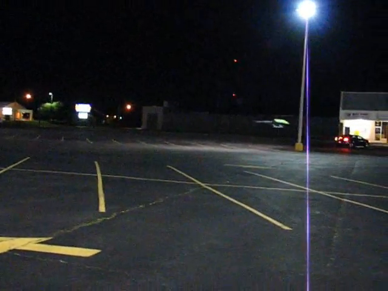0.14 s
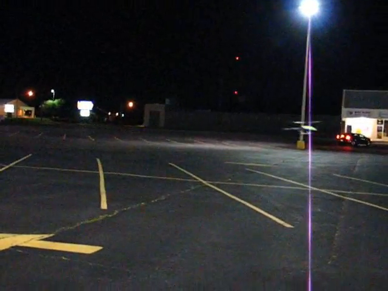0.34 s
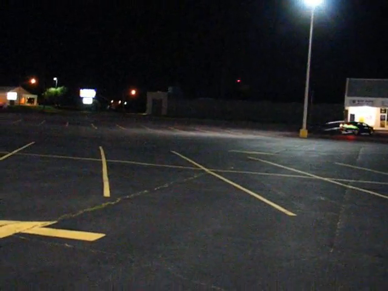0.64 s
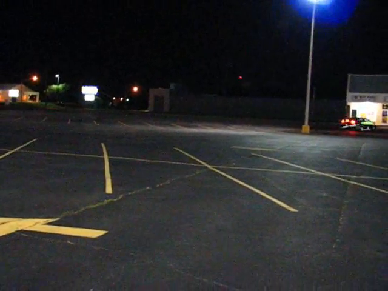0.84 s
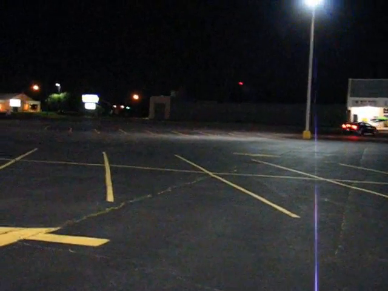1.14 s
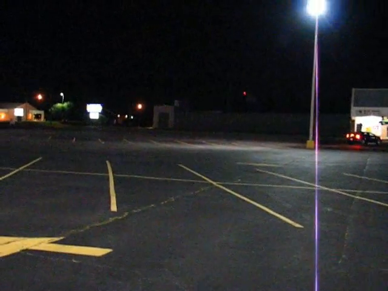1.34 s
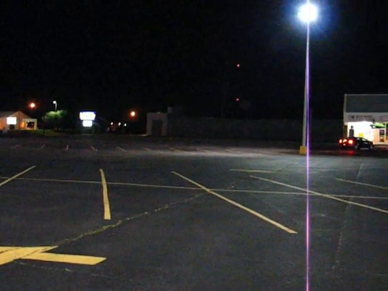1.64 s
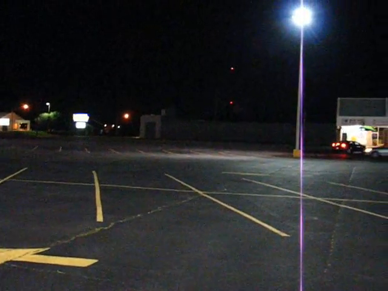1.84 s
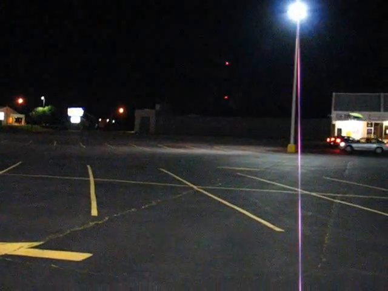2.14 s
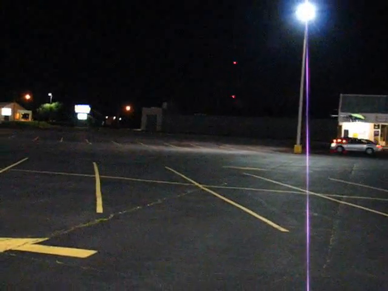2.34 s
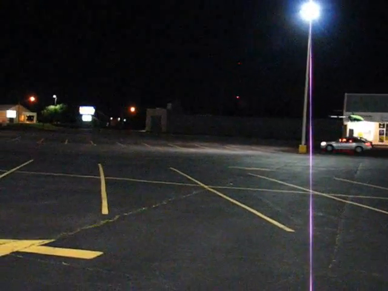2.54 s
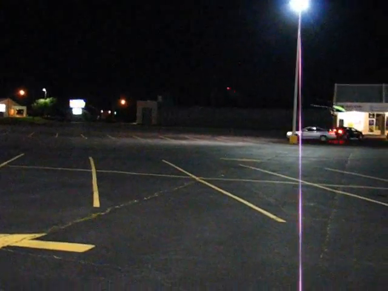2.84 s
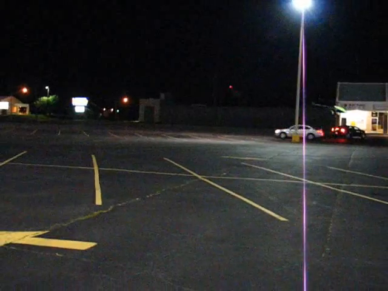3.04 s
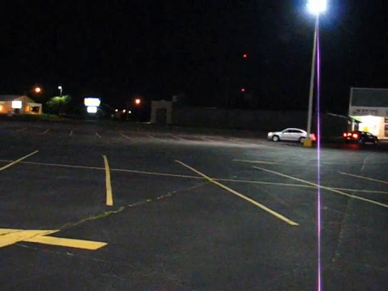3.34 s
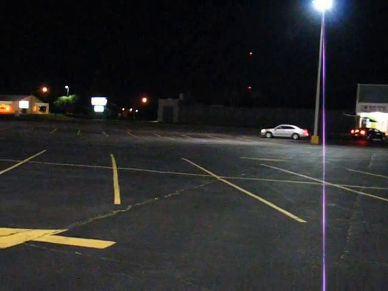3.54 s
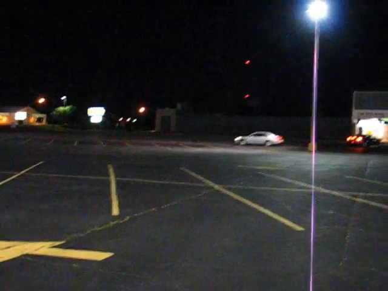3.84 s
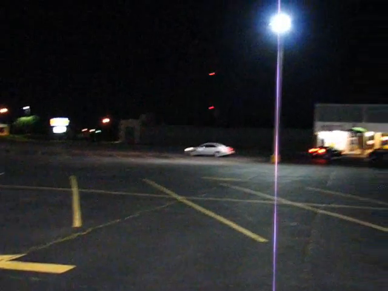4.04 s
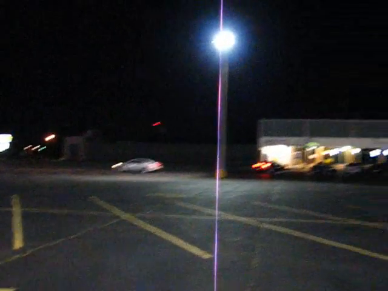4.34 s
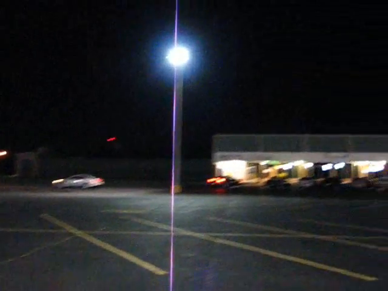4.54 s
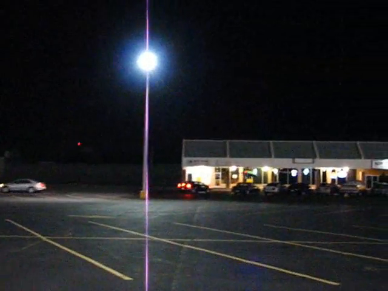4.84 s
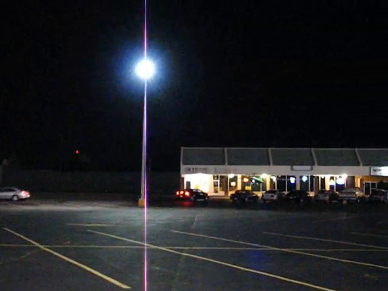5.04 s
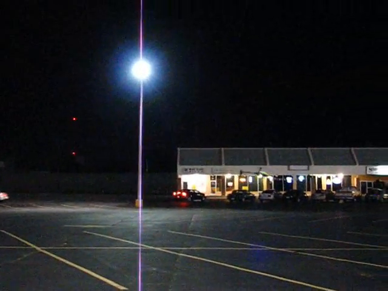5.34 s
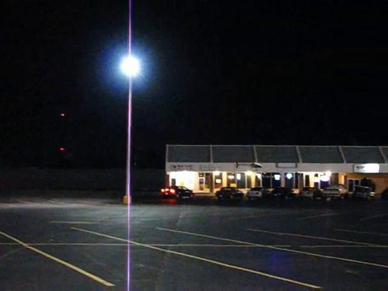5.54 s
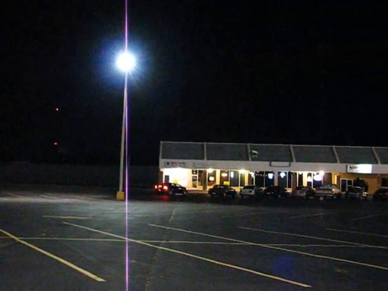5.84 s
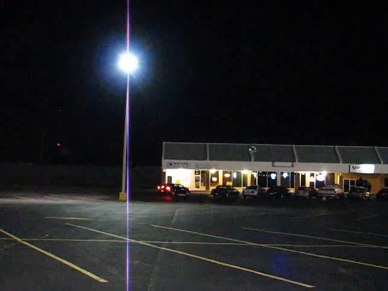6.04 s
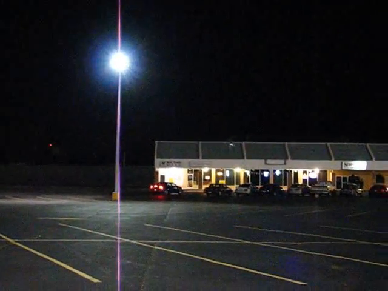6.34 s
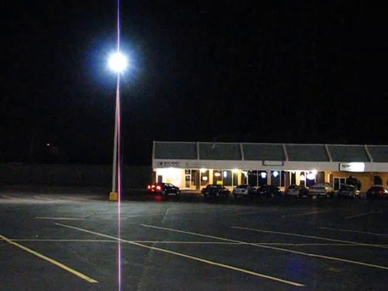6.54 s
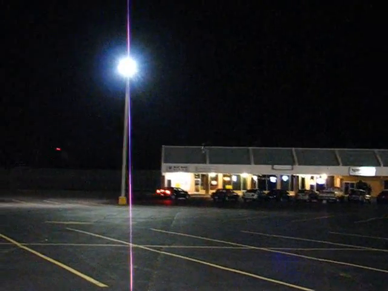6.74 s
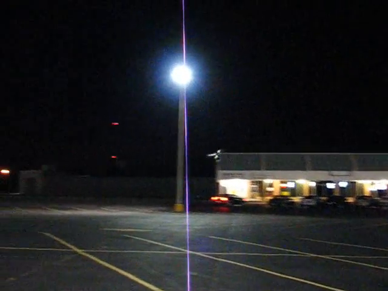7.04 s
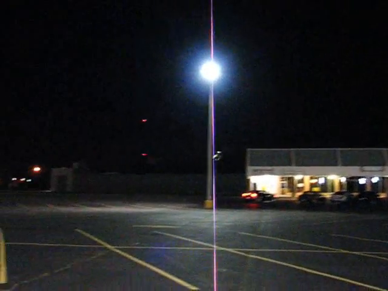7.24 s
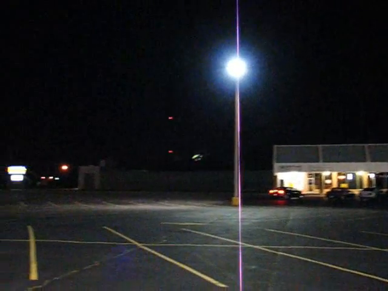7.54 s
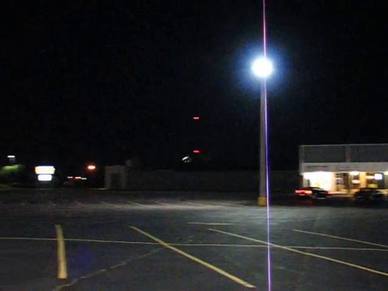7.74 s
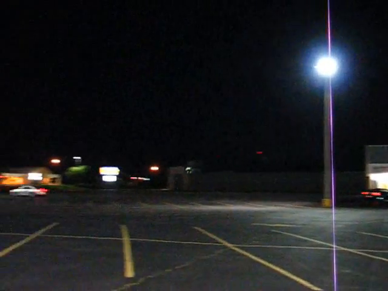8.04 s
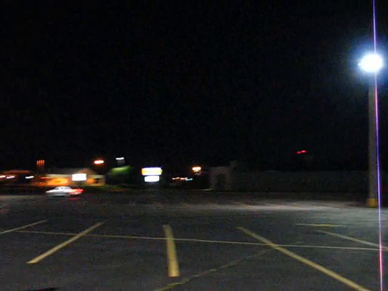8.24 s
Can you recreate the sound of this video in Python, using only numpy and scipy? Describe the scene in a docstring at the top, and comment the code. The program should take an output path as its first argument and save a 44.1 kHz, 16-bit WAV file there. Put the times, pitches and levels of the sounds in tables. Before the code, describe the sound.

A small electric model helicopter flies continuously outdoors over an empty car park. A piercing gear whine near 7.7 kilohertz wavers slightly, swelling and fading, over a bright hissing blade rush. Reflections from asphalt give the hiss a slowly sweeping, hollow comb colour. Low wind buffets mostly the left side of a handheld stereo microphone, strongest around two and four seconds, with a distant car engine and town rumble underneath.

```python
"""A small electric model helicopter circles over an empty car park at night, heard through two microphone ports.
One motor drives it all: its pinion whines on the main gear, the blades chop the air, the tail rotor hums.
The asphalt returns the rush a moment late, a sweeping comb, and some drive tones swell and fade with it.
A breeze buffets mostly the left port; far off a car pulls away, another idles, and the town rumbles.
Shafts are summed tones on shared gear angles; rush, wind and town are shaped noise."""
import sys
import numpy as np
from scipy import signal
from scipy.fft import rfft, irfft, next_fast_len
from scipy.io import wavfile
from scipy.ndimage import map_coordinates

SR = 44100
rng = np.random.default_rng(int(sys.argv[2]) if len(sys.argv) > 2 else 0)


def materialize(psi):
    """Save the field psi as 16-bit PCM at rate SR to the path in sys.argv[1].

    A 1-D psi becomes a single channel; in a 2-D psi each row is a channel.
    """
    bounded = np.clip(np.atleast_2d(psi).T, -1, 1)
    quanta = np.round(bounded * 32767).astype(np.int16)
    wavfile.write(sys.argv[1], SR, quanta)


N = 369999

PINION, MAIN_GEAR = 13, 150  # teeth
TAIL_RATIO = 106 / 25  # tail shaft turns per rotor turn

# teeth meeting per second on the main gear, sagging when the blades bite: [t/s, f/Hz]
MESH_RATE = [(0.0, 7807), (0.33, 7836), (0.47, 7821), (0.85, 7720), (1.08, 7598), (1.21, 7556),
             (1.67, 7683), (1.77, 7722), (1.87, 7714), (2.12, 7626), (2.44, 7751), (2.87, 7781),
             (3.17, 7762), (3.51, 7771), (4.01, 7650), (4.24, 7706), (4.74, 7751), (4.95, 7727),
             (5.28, 7656), (5.66, 7614), (6.11, 7606), (6.86, 7637), (7.4, 7617), (7.49, 7607),
             (7.72, 7535), (7.96, 7642), (8.17, 7708), (8.39, 7700)]
# how far the banked rotor disc faces the listener: [t/s, share 0-1]
BANK_TOWARDS_LISTENER = [(0, 0.13), (4.5, 0.1), (5.1, 0.34), (5.6, 0.29), (6.0, 0.82), (6.75, 0.93),
                         (7.15, 0.58), (7.6, .32), (8.39, 0.17)]
# port colour: [f/Hz, left minus right level/dB]
PORT_BALANCE = [(200, -2.5), (900, 1), (1800, -0.5), (2700, -3.5), (3800, -4), (5200, 0), (6500, -0.5),
                (7600, -1), (9500, -2), (11000, -2.5), (12500, 9), (15000, -4)]
# phase between the ports: [f/Hz, lead of the left/rad]
LEFT_PORT_LEAD = [(700, 0.075), (1400, 0.29), (2700, -0.89), (4300, -0.27), (6200, 0.36), (9000, -0.753),
                  (10300, 0.39), (12400, -1.44)]


def helicopter():
    """All shafts are geared together; each microphone port colours the sound in its own way."""
    mesh_hz, = curves(MESH_RATE)
    bank, = curves(BANK_TOWARDS_LISTENER)
    mesh = 2 * np.pi * np.cumsum(mesh_hz) / SR
    rotor = mesh / MAIN_GEAR
    sound = drive(mesh, mesh_hz, rotor, bank)
    sound = sound + rushing(rotor, bank)
    sound = sound + tail_rotor(rotor * TAIL_RATIO, bank)
    sound = sound + tip_chirp(rotor)

    def both_ports(hz):
        level = amp(along(PORT_BALANCE, hz) / 2)
        lead = np.exp(1j * along(LEFT_PORT_LEAD, hz) / 2)
        left = level * lead
        return np.array([left, 1 / left])

    return filtered(sound, both_ports)


# the whine swells and fades as the airframe turns and its bounce falls in and out of step:
# [t/s, level/dB before WHINE_DB]
WHINE_LEVEL = [(0.0, -28), (0.09, -25), (0.18, -29), (0.33, -24), (0.42, -30), (0.47, -24), (0.67, -29),
               (0.72, -24), (0.96, -32), (1.14, -20), (1.29, -26), (1.4, -22), (1.63, -32), (1.78, -26),
               (1.82, -30), (2.03, -19), (2.22, -30), (2.29, -22), (2.48, -26), (3.13, -24), (3.27, -28),
               (3.9, -23), (4.04, -27), (4.25, -23), (4.67, -27), (4.95, -23), (5.33, -25), (5.68, -23),
               (5.8, -26), (6.49, -23), (6.82, -31), (7.17, -22), (7.34, -30), (7.45, -29), (7.67, -17),
               (7.78, -21), (7.92, -31), (8.13, -25), (8.23, -32), (8.39, -27)]
# the whine's warble, once each rotor turn, deepest on entering the bank: [t/s, swing/rad]
WARBLE_SWING = [(0, .25), (4.7, .25), (5.1, .7), (5.7, .85), (6.2, 1.6), (6.6, .65), (7.2, .3), (8.39, .25)]
# the motor's whistle, loudest when it turns towards the listener: [t/s, level/dB before WHISTLE_DB]
WHISTLE_LEVEL = [(0, -41), (1.6, -44), (2, -37), (2.5, -47), (3.7, -38), (4.4, -48), (4.8, -41),
                 (5.16, -34), (5.48, -34.5), (5.68, -44), (5.8, -29.5), (6.1, -32), (6.4, -36), (6.55, -30),
                 (6.8, -27), (7.1, -34), (7.3, -43), (7.47, -34.5), (7.9, -41), (8.15, -35.5), (8.39, -38)]
# side tones of an out-of-round main gear: [rotor orders off the mesh], then [level/dB in level flight]
SIDE_OFFSETS = (-8, -4.24, 4.24, 8)
SIDE_LEVELS = [-37, -41, -45, -38]
# side tones just under the mesh: [rotor orders off the mesh], then [level/dB at full resonance]
JUDDER_OFFSETS = (-4, -3, -2, -1)
JUDDER_LEVELS = [-32, -31, -34.5, -28.5]
# motor hum: [multiples of the motor shaft speed], then [relative level/dB]
HUM_ORDERS = (1, 2, 3, 4, 5, 10, 11, 14)
HUM_LEVELS = [1, -12.5, -8, -3, 2.5, -6, -6, -36]
WHINE_DB, WHISTLE_DB = 0.3, 2  # added to their level curves
UNDER_DB, UNDER_BANK_DB = -40.5, 10  # in level flight, and the change in a full bank
HUM_DB, HUM_BANK_DB, HUM_WANDER_DB = -50.3, 9.5, 0.58  # the same, and a slow wander
FRAME_HZ, FRAME_WIDTH_HZ = 7520, 74  # a resonance of the frame, neared when the motor bogs down
GEAR_MIRROR, LOW_MIRROR = 0.35, 0.66  # share mirrored by the asphalt: gear side tones, low tones


def drive(mesh, mesh_hz, rotor, bank):
    """Pinion teeth whine on the main gear; the motor hums and its nine slots whistle."""
    whine_db, = curves(WHINE_LEVEL)
    warble, = curves(WARBLE_SWING)
    whistle_db, = curves(WHISTLE_LEVEL)
    motor = mesh / PINION
    teeth = mesh + warble * np.sin(rotor)

    whine = amp(whine_db + WHINE_DB) * tone(teeth, flutter_db=0.3, smear=0.24, rate=39)
    whine = whine * chop(rotor, once=0.07 + 0.15 * bank, twice=0.044)
    # so short a wave meets the two ports unevenly, and drifts between them
    drift_db = 1.0 * wobble(11)
    whine = whine * amp([drift_db, -drift_db])

    side_orders = np.add(MAIN_GEAR, SIDE_OFFSETS)
    sides = amp(3.5 * bank) * tones(rotor, side_orders, SIDE_LEVELS, flutter_db=2.5, smear=0.68, rate=25)

    # the ringing frame picks up the side tones just under the mesh, and the whine turns harsh
    ringing = 1 / (1 + ((mesh_hz - FRAME_HZ) / FRAME_WIDTH_HZ) ** 2)
    judder_orders = np.add(MAIN_GEAR, JUDDER_OFFSETS)
    judder = tones(rotor, judder_orders, JUDDER_LEVELS, flutter_db=3.0, smear=0.52, rate=30)
    judder = ringing ** 4 * judder

    whistle = amp(whistle_db + WHISTLE_DB) * tone(9 * motor, flutter_db=0.5, smear=0.12, rate=14)

    hum_db = HUM_DB + HUM_BANK_DB * np.sqrt(np.abs(bank)) + HUM_WANDER_DB * wobble(3.017)
    hum = amp(hum_db) * tones(motor, HUM_ORDERS, HUM_LEVELS, flutter_db=1.6, smear=0.35, rate=12)

    # the pinion's once-a-turn wobble sings below the mesh, loudest in the bank with the gear in plain view
    under = amp(UNDER_DB + UNDER_BANK_DB * bank) * tone(teeth - motor, flutter_db=1.5, smear=0.35, rate=25)
    under = under * chop(rotor, once=0.2 * bank, twice=0.05)

    direct = whine + judder + whistle
    echoes = amp(-12) * scatter(whine, t60=0.37)
    return direct + echoes + ground(under + sides, GEAR_MIRROR) + ground(hum, LOW_MIRROR)


# hiss sent towards the listener: [t/s, gear hiss level/dB before trim and bank, fine treble hiss level/dB]
HISS_LEVELS = [(0.0, -21.5, -34), (0.14, -20, -32.5), (0.82, -22, -34.5), (1.54, -22.5, -28),
               (1.78, -19.5, -29), (2.05, -22.5, -36), (3.55, -19.5, -31), (3.88, -21.5, -37.5),
               (4.25, -21, -32.5), (4.32, -25, -34), (4.7, -19, -33), (4.86, -20.5, -34),
               (5.58, -19.5, -29.5), (7.01, -24.5, -39.5), (7.57, -22, -38), (7.83, -25.5, -41.5),
               (7.92, -23.5, -39.5), (8.39, -24, -38.5)]
# main blades' whoosh, following load and distance: [t/s, level/dB before WHOOSH_DB]
WHOOSH_LEVEL = [(0.0, -30), (0.23, -28), (1.12, -27.5), (1.17, -31.5), (1.4, -29), (1.42, -33),
                (1.75, -26.5), (2.29, -31), (2.97, -25.5), (3.2, -28.5), (3.36, -27.5), (4.28, -29),
                (4.37, -33), (4.6, -27.5), (5.61, -29), (6.8, -34.5), (7.57, -26.5), (7.74, -31),
                (8.2, -27.5), (8.39, -29)]
# narrow sizzle, probably eddies shed from the blades' trailing edges: [t/s, level/dB]
SIZZLE_CURVE = [(0, -31.5), (.2, -31.5), (.6, -30), (.8, -40), (1.25, -33.5), (1.5, -40.5), (2, -35),
                (2.4, -36), (3.6, -32.5), (4.3, -33.5), (4.75, -32.5), (5.5, -35), (6.4, -47), (7, -51),
                (7.6, -36), (8.3, -35)]
# how hard whoosh and gear hiss pulse with each rotor turn: [t/s, depth 0-1]
PULSE_DEPTH = [(0, .08), (.6, .04), (4.3, .04), (4.7, .11), (5.5, .16), (5.9, .08), (8.39, .04)]
# how cleanly the asphalt returns the rush: [t/s, share of the mids 0-1, share of the treble 0-1]
BOUNCE_CLARITY = [(0, .5, .44), (.6, .7, .4), (1.1, .97, .38), (1.4, .65, .35), (1.75, .88, .4),
                  (2.15, .88, .55), (2.6, .62, .35), (3.3, .6, .28), (3.8, .58, .5), (4.25, .95, .62),
                  (4.6, .62, .55), (5, .68, .6), (5.8, .55, .3), (6.9, .7, .32), (7.4, .62, .6),
                  (7.8, .68, .76), (8.39, .9, .68)]
# noise colours of blades, sizzle, tooth friction, fine hiss and downwash: [f/Hz, relative level/dB per Hz]
WHOOSH_COLOUR = [(150, -9.5), (350, -2), (700, -8.5), (1000, -10.5), (1400, -5.5), (1900, -3.3), (2400, -1),
                 (3000, 2), (3350, 1.46), (3750, 0), (4300, 0.5), (6500, -4.5), (9000, -13.5), (15000, -48)]
SIZZLE_COLOUR = [(3100, -40), (3500, -6.5), (3750, 0), (3950, -4), (4400, -45)]
GEAR_COLOUR = [(2500, -32), (4500, -12), (6000, -4.5), (7000, -1), (7700, 0), (8300, -4.5), (9300, -8.5),
               (11000, -20), (15000, -54)]
AIR_COLOUR = [(7000, -29), (9500, 5.5), (11000, 14.5), (12400, 14.5), (13800, 6), (15200, -16)]
WASH_COLOUR = [(150, -13), (350, 7.5), (520, -14), (700, 2), (950, -31), (1500, -14)]
# what the asphalt mirrors, before its clarity; rough ground scatters the highest: [f/Hz, share]
MIDS_MIRROR = [(300, .45), (900, .7), (1400, 1), (1900, 1), (2600, 0)]
TREBLE_MIRROR = [(1900, 0), (2600, 1), (4000, .74), (7000, .48), (12000, .12)]
WHOOSH_DB = 3.5  # added to its level curve
GEAR_DB, GEAR_BANK_DB = -0.4062, 0.25  # added to its level curve, and the change in a full bank


def rushing(rotor, bank):
    """Blades, tooth friction and downwash pulse with the rotor; the bounce sweeps notches through them."""
    gear_db, air_db = curves(HISS_LEVELS)
    whoosh_db, = curves(WHOOSH_LEVEL)
    sizzle_db, = curves(SIZZLE_CURVE)
    pulsing, = curves(PULSE_DEPTH)
    mids_share, treble_share = curves(BOUNCE_CLARITY)

    whoosh = amp(whoosh_db + WHOOSH_DB) * wide_noise(WHOOSH_COLOUR) * chop(rotor, once=pulsing, twice=0.04)
    sizzle = amp(sizzle_db) * wide_noise(SIZZLE_COLOUR) * chop(rotor, once=0.05, twice=0.1)
    gear_gain = amp(gear_db + GEAR_DB + GEAR_BANK_DB * bank)
    gears = gear_gain * wide_noise(GEAR_COLOUR) * chop(rotor, once=pulsing, twice=0.06)
    # the louder the fine hiss, the harder the blades chop it
    swish = np.minimum(amp(air_db + 33), 1.3)
    air = amp(air_db) * wide_noise(AIR_COLOUR) * chop(rotor, once=0.18 * swish, twice=0.24 * swish)
    wash = amp(-31.5) * bank * wide_noise(WASH_COLOUR) * chop(rotor, once=0.266, twice=0.39)

    rush = whoosh + sizzle + gears + air + wash
    mids = filtered(rush, lambda hz: along(MIDS_MIRROR, hz))
    treble = filtered(rush, lambda hz: along(TREBLE_MIRROR, hz))
    return rush + bounce(mids_share * mids + treble_share * treble)


# the tail rotor's work against the torque: [t/s, shaft buzz level/dB]
TAIL_BUZZ_LEVEL = [(0, -43), (.27, -39.5), (.9, -42.5), (1.5, -49), (2, -39.5), (2.45, -46), (3.05, -38.5),
                   (3.3, -43), (3.95, -42), (4.3, -56), (4.7, -41), (5.02, -55), (5.2, -45.5), (6.15, -39),
                   (6.95, -48), (7.5, -44), (8.39, -43)]
# low tail blade tone: [t/s, level/dB]
LOW_BLADE_LEVEL = [(0, -50.5), (.22, -42), (.45, -52), (.85, -44), (1.15, -49.5), (1.6, -50), (1.72, -42.5),
                   (1.82, -50), (1.94, -36), (2.04, -50), (2.13, -43), (2.25, -50), (3.7, -46.5),
                   (4.5, -52), (5.2, -45), (5.9, -53.5), (6.7, -57), (7.3, -43), (7.7, -43), (8.25, -34.5)]
# high tail blade tones together: [t/s, gain/dB]
HIGH_BLADE_LEVEL = [(0, -45), (1.1, -42.5), (1.5, -46), (3.1, -43), (4.7, -45.5), (5.3, -42), (6.6, -56.5),
                    (7.4, -39), (7.8, -41.5), (8.2, -37)]
# high tail blade tones: [multiples of the tail shaft speed], then [relative level/dB]
HIGH_BLADE_ORDERS = (6, 8, 9, 10, 11, 12)
HIGH_BLADE_DBS = [0, -4, -3, -2, -3, -5]


def tail_rotor(tail, bank):
    """The geared-up tail shaft buzzes; its two blades cut the ragged wake of the main rotor."""
    buzz_db, = curves(TAIL_BUZZ_LEVEL)
    low_db, = curves(LOW_BLADE_LEVEL)
    high_db, = curves(HIGH_BLADE_LEVEL)
    thrust = amp(-37.5) * np.abs(bank) ** 1.2 * tone(2 * tail, flutter_db=1.2, smear=0.15, rate=12)
    buzz = amp(buzz_db) * tone(3 * tail, flutter_db=1.46, smear=0.2, rate=20)
    low = amp(low_db) * tone(4 * tail, flutter_db=1.8, smear=0.29, rate=34)
    # the wake blurs the high blade tones into narrow bands
    high = tones(tail, HIGH_BLADE_ORDERS, HIGH_BLADE_DBS, flutter_db=1.8, smear=1.15, rate=60)
    return thrust + low + ground(buzz + amp(high_db) * high, LOW_MIRROR)


TIP_AT_S, TIP_HALF_S = 1.42, 0.24  # moment of the chirps, and time to fall to 1/e on either side
TIP_DB, TIP_HZ, TIP_RISE_HZ = -41, 12200, 380  # peak level, pitch, rise per radian of the turn


def tip_chirp(rotor):
    """A thin rising chirp once each rotor turn, probably a whistling blade tip swinging towards the listener."""
    turn = rotor % (2 * np.pi) - np.pi
    facing = np.exp(-((np.arange(N) / SR - TIP_AT_S) / TIP_HALF_S) ** 2)
    angle = 2 * np.pi * np.cumsum(TIP_HZ + TIP_RISE_HZ * turn) / SR
    flash = unit(np.exp(-(turn / 0.8) ** 2))
    return amp(TIP_DB) * facing * flash * tone(angle, flutter_db=2.5, smear=0.9, rate=500)


def ground(x, share):
    """With their bounce added, steady tones swell and fade as its lag changes."""
    return x + share * bounce(x)


# lag of the bounce off the asphalt, longer when flying high or near: [t/s, lag/ms]
BOUNCE_LAG = [(0, 1.385), (.13, 1.365), (.29, 1.295), (.42, 1.18), (.6, 1.07), (.82, .94), (1.0, .915),
              (1.12, .955), (1.3, 1.08), (1.54, 1.225), (1.9, 1.255), (2.35, 1.43), (2.77, 1.41),
              (3.12, 1.52), (3.32, 1.47), (3.6, 1.345), (3.79, 1.325), (4.31, 1.42), (5.07, 1.32),
              (5.55, 1.41), (5.97, 1.545), (6.32, 1.575), (6.8, 1.52), (7.2, 1.466), (7.58, 1.355),
              (7.79, 1.335), (7.96, 1.275), (8.16, 1.14), (8.39, 1.065)]


def bounce(x):
    """The sound as it arrives a moment later off the asphalt."""
    lag_ms, = curves(BOUNCE_LAG)
    late = np.arange(N) - lag_ms * SR / 1000
    return np.array([map_coordinates(port, [late]) for port in x])


def scatter(x, t60):
    """Shop fronts and parked cars return a spread of echoes, different at each port, down 60 dB in t60 s."""
    t = np.arange(SR // 2) / SR
    tail = rng.standard_normal((2, len(t))) * amp(-60 * t / t60)
    return signal.fftconvolve(x, tail / np.linalg.norm(tail[0]), axes=1)[:, :N]


# noise colours of small eddies, large eddies and the highest ones: [f/Hz, relative level/dB per Hz]
SMALL_EDDIES = [(20, -34), (60, -17), (100, -2.5), (160, 3), (270, -3.5), (420, -11.5), (700, -20),
                (2000, -45)]
LARGE_EDDIES = [(20, -20), (45, -6.5), (85, 4), (140, 1), (250, -32), (600, -57)]
HIGHEST_EDDIES = [(200, -22), (340, 0), (480, -8), (800, -26), (2000, -60)]
FLURRY_DB, STRONG_GUST_DB = -36, -25  # the highest eddies' level in a gust of that strength, before port gain


def wind():
    """Eddies hit the left port and barely touch the right; strong gusts mostly add small, higher-pitched ones."""
    gust_db = gusts()

    def eddies(spectrum):
        return np.array([unit(noise(spectrum) * amp(1.8 * wobble(30))) for _ in range(2)])

    small = amp(gust_db + 2.5) * eddies(SMALL_EDDIES)
    large = amp(0.29 * gust_db - 24.5) * eddies(LARGE_EDDIES)
    flurry = amp(FLURRY_DB + 2 * (gust_db - STRONG_GUST_DB)) * eddies(HIGHEST_EDDIES)
    return amp([[7], [-11]]) * (small + large + flurry)


# gusts at the microphone: [peak t/s, strength level/dB, time/s to fall by GUST_FALL_DB on either side]
GUST_PEAKS = [(0.049, -31.5, 0.4), (.52, -29.5, 0.08), (1.14, -29.5, 0.23), (2.03, -27, 0.14),
              (2.3, -23.5, .05), (2.36, -25.5, 0.58), (2.86, -31.5, 0.1), (3.31, -32, .13),
              (3.78, -29, 0.2), (4.25, -27, .58), (4.29, -23, 0.1169), (4.66, -30, 0.22),
              (5.4, -34.5, 0.42), (5.7, -30.5, 0.0145), (7.41, -40, .08), (7.86, -37.5, .12),
              (8.25, -31.5, 0.1)]
GUST_FALL_DB, CALM_DB = 9, -59  # CALM_DB is the lull between gusts


def gusts():
    """Strength of the breeze in dB: each gust swells to its peak and dies back towards the calm."""
    t = np.arange(N) / SR
    swells = [db - GUST_FALL_DB * np.abs(t - s) / length for s, db, length in GUST_PEAKS]
    return np.maximum(np.max(swells, axis=0), CALM_DB)


# the departing car: [t/s, firing f/Hz, level/dB]
CAR_PULLING_AWAY = [(.7, 103, -52), (1.5, 112, -30), (2.2, 124, -39.5), (3.1, 138.6, -34.5),
                    (4.8, 151.6, -45.5), (5.2, 135, -37), (5.6, 104.7, -40.5), (6.8, 105, -34.5),
                    (8.39, 112, -36.5)]
# low throb of a second engine idling: [t/s, level/dB]
IDLE_LEVEL = [(0, -45), (2.6, -42.5), (3.6, -68), (4.6, -45), (5.8, -35), (7.3, -45), (8.39, -37.5)]
# rumble of the town: [f/Hz, relative level/dB per Hz]
TOWN_COLOUR = [(20, -14), (45, -2), (100, -6), (200, -7), (400, -18), (950, -14), (1450, -26), (4000, -32)]


def traffic(idle_hz=45, drone_hz=104):
    """A distant car gathers speed and changes up; another idles in the rumble of the town, over a steady drone."""
    firing_hz, car_db = curves(CAR_PULLING_AWAY)
    idle_db, = curves(IDLE_LEVEL)
    crank = np.pi * np.cumsum(firing_hz) / SR  # two firings a turn
    steady = 2 * np.pi * np.arange(N) / SR
    car = amp(car_db) * tones(crank, [2, 3, 4], [0, -14, -16], flutter_db=2.5, smear=0.42, rate=8)
    idle = amp(idle_db) * tone(steady * idle_hz, flutter_db=2.0, smear=0.8, rate=6.5)
    drone = tones(steady * drone_hz, [1, 2], [-43, -51], flutter_db=0.5, smear=0.96, rate=6)
    town = amp(-36.8) * wide_noise(TOWN_COLOUR)
    return car + idle + drone + town


def tones(angle, orders, dbs, flutter_db, smear, rate):
    """Multiples of a shaft angle; moving air shakes each in level and phase, a little differently at each port."""
    out = np.zeros((2, N))
    for order, db in zip(orders, dbs):
        phase = order * angle + smear * wobble(rate)
        apart = 0.068 * wobble(3.1)
        gain = np.sqrt(2) * amp(db + flutter_db * wobble(6))
        out += gain * np.sin([phase + apart, phase - apart])
    return out


def tone(angle, flutter_db, smear, rate):
    """A single such line at 0 dB."""
    return tones(angle, [1], [0], flutter_db, smear, rate)


def chop(rotor, once, twice):
    """Loudness swing with each rotor turn and with each of its two blades."""
    return unit(1 + once * np.cos(rotor) + twice * np.cos(2 * rotor))


# how alike wide noise is in the two ports: [f/Hz, likeness 0-1]
PORT_LIKENESS = [(100, 1), (600, 0.979), (2500, 0.856), (5000, 1), (8000, 1), (12000, 0.71)]


def wide_noise(spectrum):
    """Coloured stereo noise: a shared middle plus an opposed side, partly alike in the two ports."""
    def mid_and_side(hz):
        turn = np.arccos(np.clip(along(PORT_LIKENESS, hz), -1, 1)) / 2
        return np.array([np.cos(turn), np.sin(turn)])

    mid, side = filtered(np.array([noise(spectrum), noise(spectrum)]), mid_and_side)
    return np.array([mid + side, mid - side])


def noise(spectrum):
    """Coloured noise of rms 1."""
    return unit(filtered(rng.standard_normal(N), lambda hz: amp(along(spectrum, hz))))


def wobble(rate):
    """A smooth random curve, rate knots a second."""
    knots = rng.standard_normal(int(N * rate / SR) + 4)
    return map_coordinates(knots, [np.arange(N) * rate / SR])


def filtered(x, response):
    """x times a response of frequency."""
    m = next_fast_len(N + SR // 2)
    return irfft(rfft(x, m) * response(np.fft.rfftfreq(m, 1 / SR)), m)[..., :N]


def curves(rows):
    """One value per sample for each column after the time."""
    s, *cols = np.transpose(rows)
    return [np.interp(np.arange(N) / SR, s, c) for c in cols]


def along(points, hz):
    """(Hz, value) points on a log axis."""
    f, v = np.transpose(points)
    return np.interp(np.log(hz + 1), np.log(f + 1), v)


def amp(db):
    """Decibels to gain."""
    return 10 ** (np.asarray(db) / 20)


def unit(x):
    """Scale to rms 1."""
    return x / np.sqrt(np.mean(x ** 2) + 1e-20)


def scene():
    """The helicopter over breeze and distant traffic."""
    return helicopter() + wind() + traffic()


TOP_HZ = 15250  # band limit


def record(dry):
    """The microphone's electronics thin the deepest bass (18 Hz corner) and keep nothing above the band limit."""
    return filtered(dry, lambda hz: (hz < TOP_HZ) * hz / np.hypot(hz, 18))


dry = scene()
out = record(dry)
materialize(out)
```